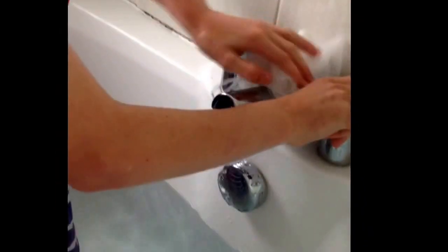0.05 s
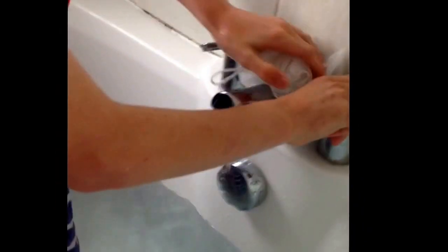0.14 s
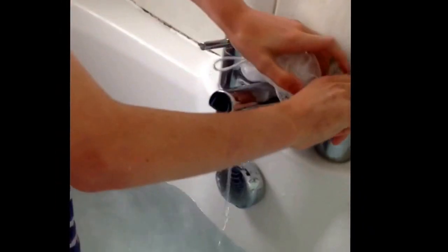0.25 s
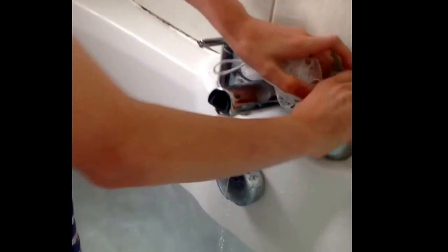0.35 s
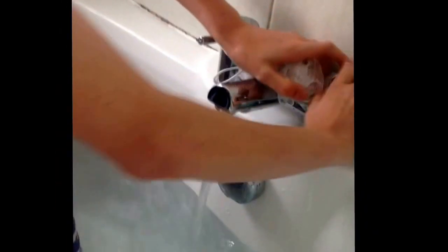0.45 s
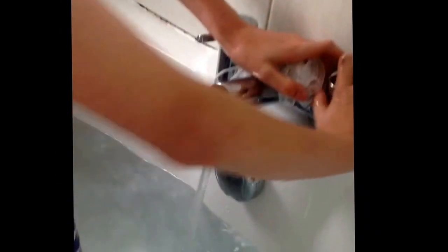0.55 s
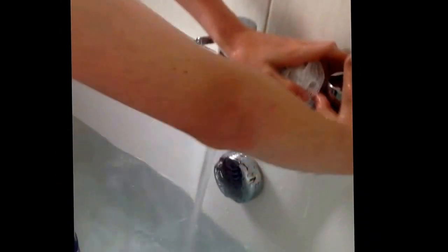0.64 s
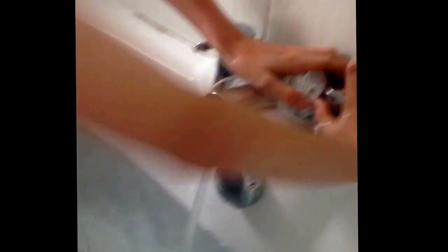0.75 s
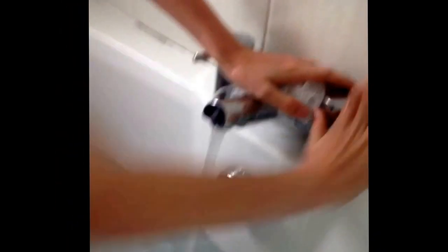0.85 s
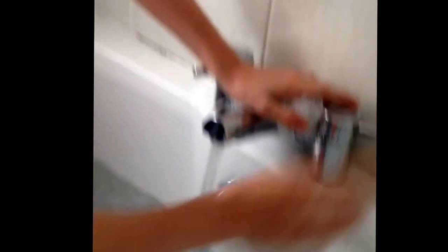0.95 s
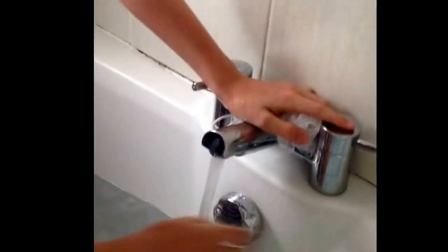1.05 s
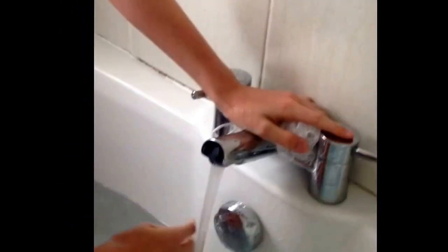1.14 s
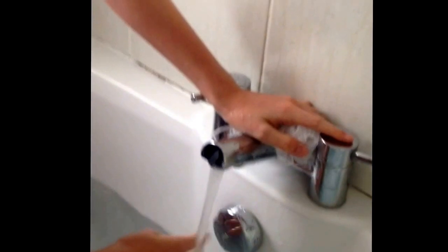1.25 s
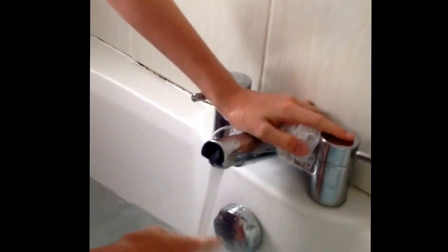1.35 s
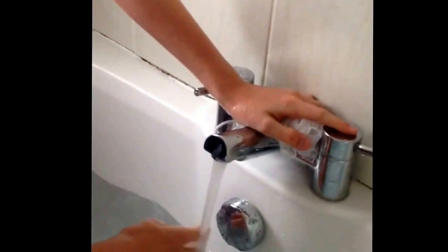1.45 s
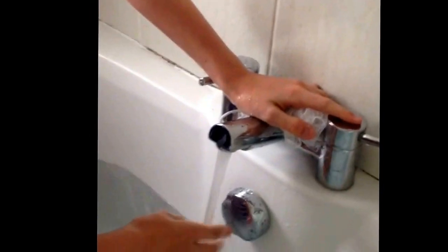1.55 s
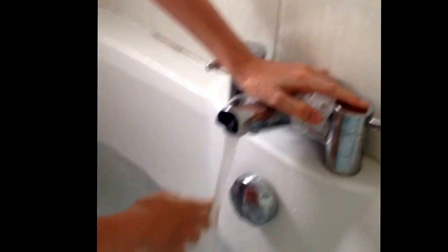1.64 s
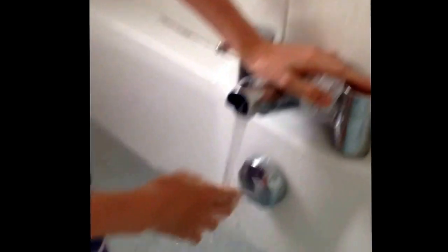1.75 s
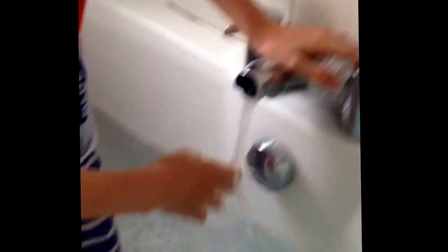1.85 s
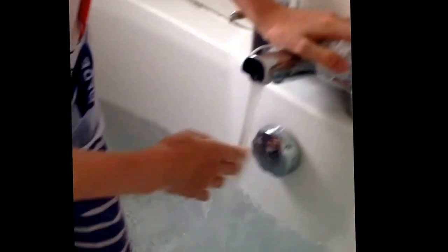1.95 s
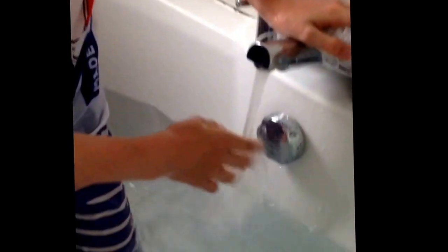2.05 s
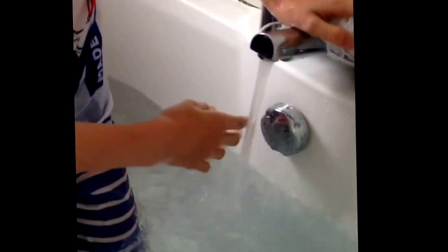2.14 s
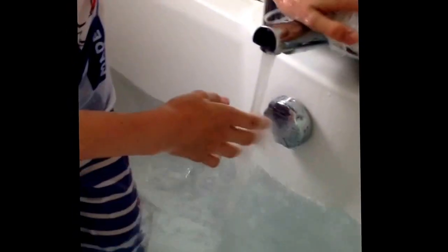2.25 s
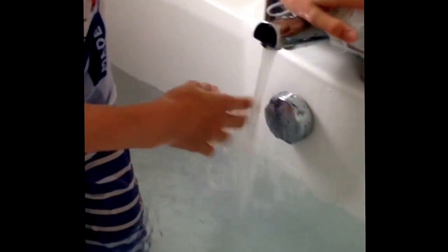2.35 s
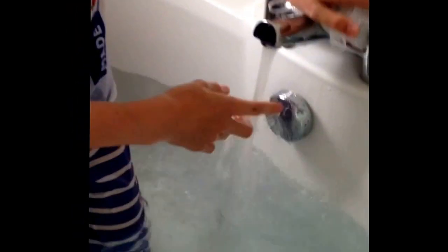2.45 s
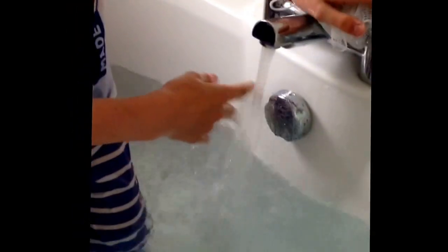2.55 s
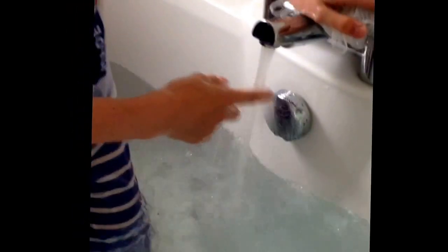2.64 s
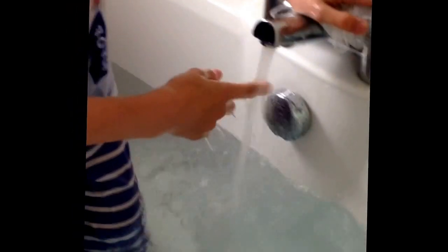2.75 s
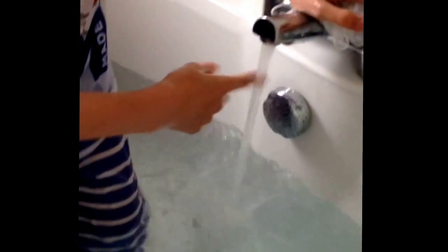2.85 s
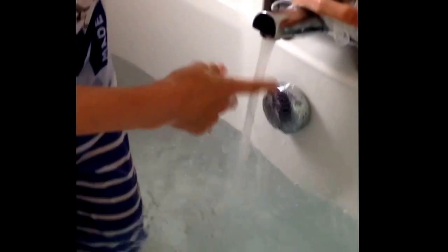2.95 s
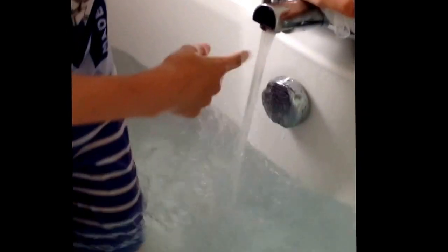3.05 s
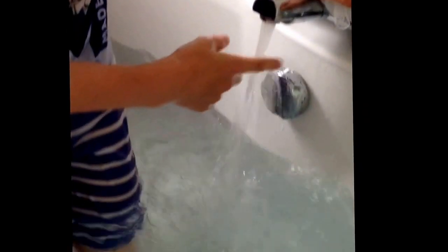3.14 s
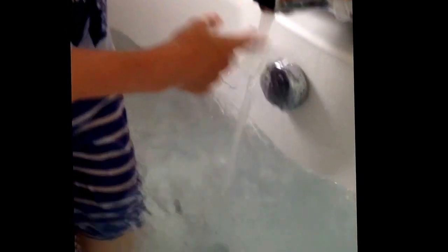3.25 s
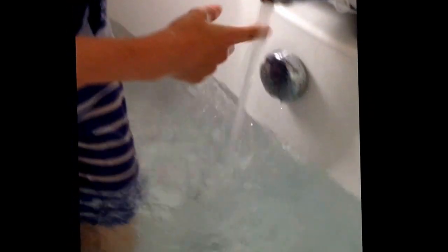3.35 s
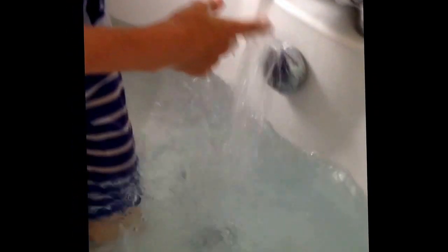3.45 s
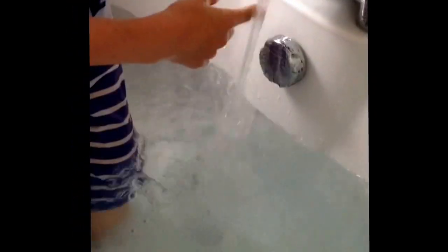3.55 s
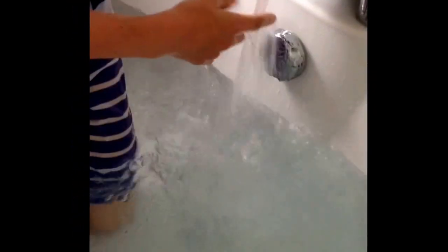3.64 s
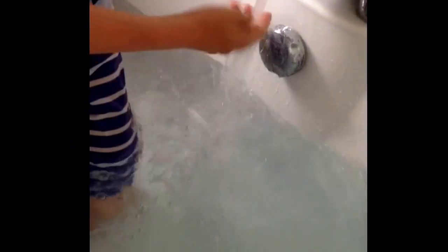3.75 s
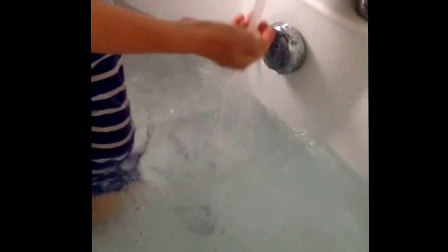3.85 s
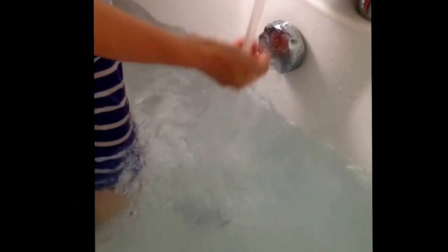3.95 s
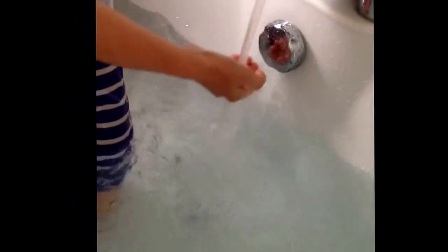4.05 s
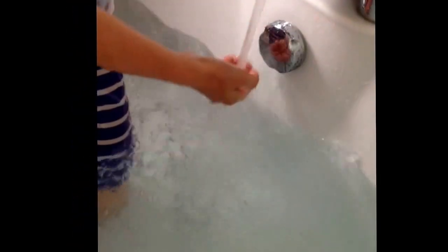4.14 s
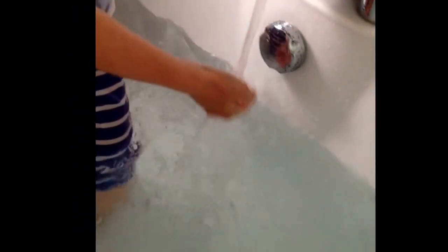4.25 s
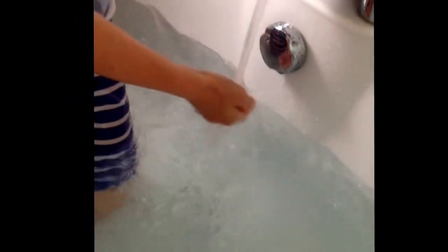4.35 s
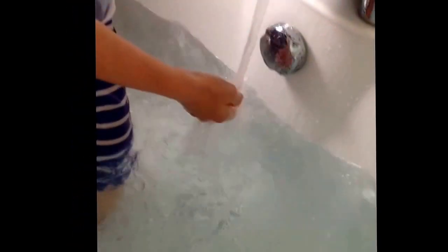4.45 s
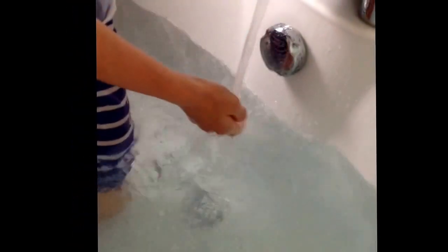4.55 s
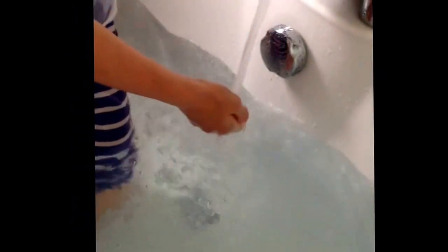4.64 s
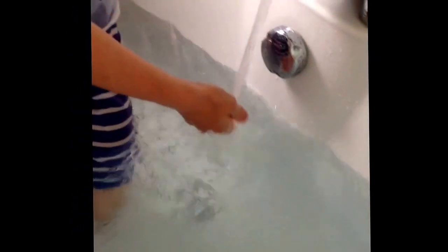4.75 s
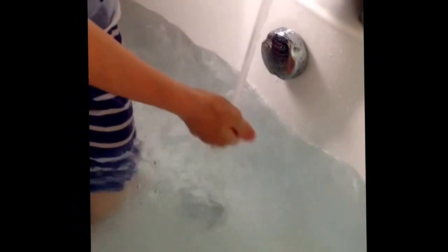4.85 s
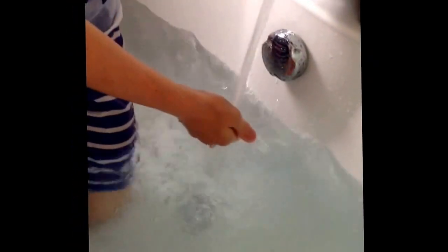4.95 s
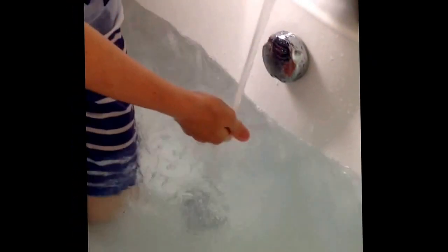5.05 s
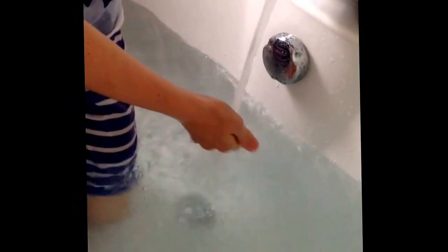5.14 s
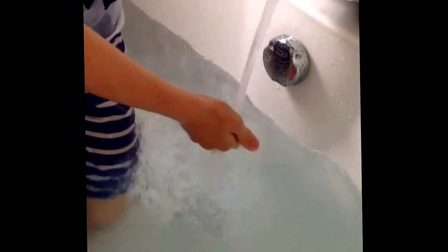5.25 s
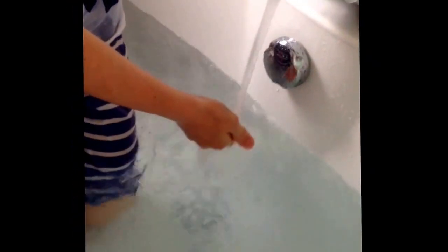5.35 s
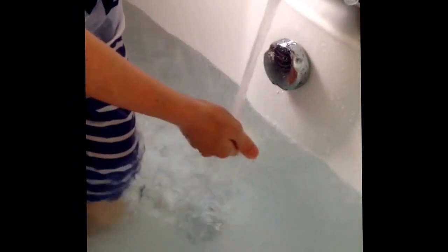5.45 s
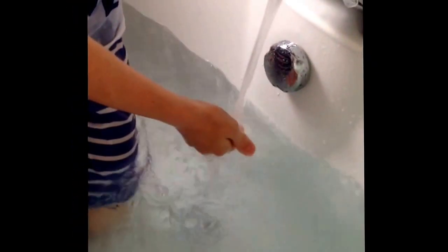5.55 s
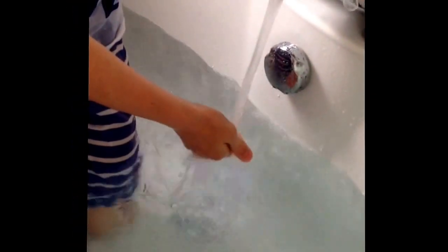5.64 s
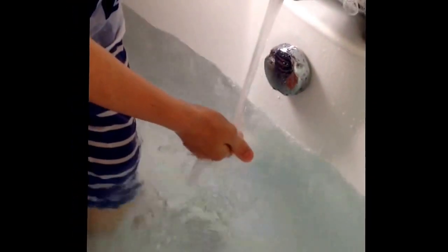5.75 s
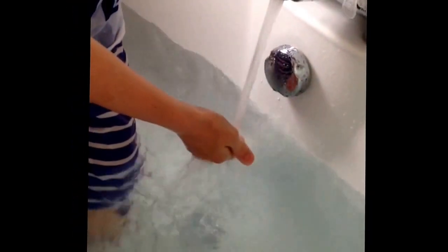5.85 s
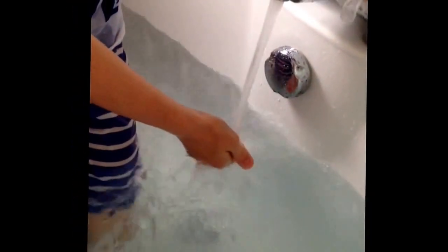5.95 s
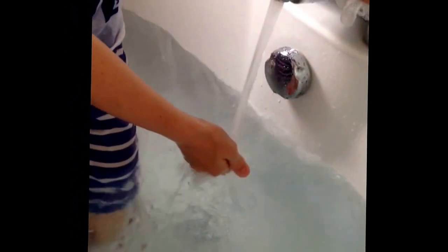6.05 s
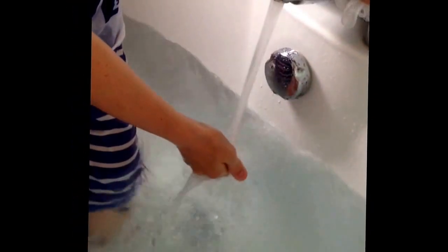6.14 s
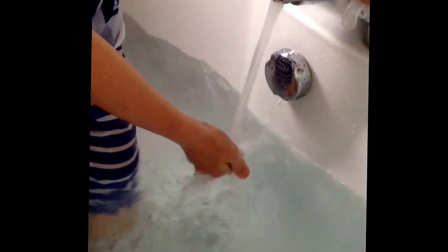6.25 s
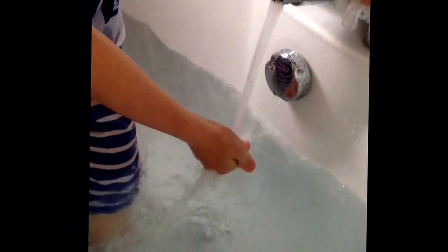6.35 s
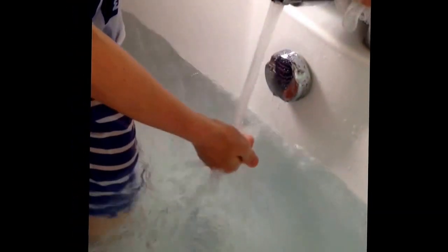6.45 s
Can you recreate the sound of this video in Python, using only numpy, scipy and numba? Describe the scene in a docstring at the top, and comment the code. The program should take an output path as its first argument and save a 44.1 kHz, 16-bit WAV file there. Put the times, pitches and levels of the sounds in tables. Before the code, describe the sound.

Close in a tiled bathroom, a near-silent moment with a faint pipe murmur and low plop. The tap valve hisses, hums and gives a tiny high whistle, then water surges into a full tub with bubbling and hollow drumming. A hand chops the stream into quick splashing slugs, then catches it, leaving a bright, steady patter with scattered plops.

```python
"""A bath tap is opened over a filled tub in a tiled bathroom, with one microphone near.
First the quiet room, a murmur in the pipe and one faint, low plop; then the valve hisses, hums and whistles.
The water surges: spray fizzes (noise and ticks), bubbles ring (damped sines), the jet drums (low modes).
A hand cuts in and out of the stream, so it lands in slugs, then catches it so that it only patters.
Most of the water's sound is also thrown back by the tiles, as echoes and a short tail."""
import sys
import numpy as np
from scipy import signal
from scipy.io import wavfile
from scipy.ndimage import uniform_filter1d
from numba import njit

SR = 44100
rng = np.random.default_rng(int(sys.argv[2]) if len(sys.argv) > 2 else 0)


def output_pcm(signal):
    """Save a mono or channel-first signal as 16-bit PCM at the path in sys.argv[1].

    Samples are clipped to [-1, 1] before scaling.
    """
    pcm = np.clip(np.atleast_2d(signal).T, -1, 1) * 32767
    wavfile.write(sys.argv[1], SR, np.round(pcm).astype(np.int16))


N = 287091  # length in samples


def gain_of(db):
    """Turn decibels into a plain multiplier."""
    return 10 ** (np.asarray(db) / 20)


def evened(x):
    """Scale a signal to an average (RMS) level of one."""
    return x / np.sqrt(np.mean(x ** 2) + 1e-20)


def smoothed_twice(x, size):
    """Two running averages along the samples leave only slow wandering."""
    return uniform_filter1d(uniform_filter1d(x, size=size), size=size)


def read(points, hz):
    """Look up a curve drawn over pitch, with straight lines on a log-pitch scale."""
    f, value = np.transpose(points)
    return np.interp(np.log(hz + 1), np.log(f + 1), value)


def hiss(spectrum, patchy_db, flicker_db):
    """Random short-time spectra with drifting patches and a flicker shared by all bands."""
    frames, hz = N // 128 + 5, np.fft.rfftfreq(512, 1 / SR)
    a, b, patches = rng.standard_normal((frames, 257, 3)).T
    patches = uniform_filter1d(patches, size=8, axis=0)  # across pitch
    patches = evened(uniform_filter1d(patches, size=10, axis=1))  # across time
    flicker = evened(uniform_filter1d(rng.standard_normal(frames), size=3))
    level_db = read(spectrum, hz)[:, None] + patchy_db * patches + flicker_db * flicker
    spectra = (a + 1j * b) * gain_of(level_db)
    return evened(signal.istft(spectra, nperseg=512, noverlap=384)[1][:N])


# The empty room's noise. Each row: pitch in Hz, relative level in dB per Hz.
QUIET = [(24, -52), (40, -4), (162, 3.5), (562, -19), (859, -4), (1310, -24), (1960, -19.5), (6640, -17.5),
         (9890, -9), (15500, -16)]
QUIET_DB = -57


def quiet_room():
    """The empty room is a faint steady noise with its own tone colour."""
    return gain_of(QUIET_DB) * hiss(QUIET, patchy_db=2.5, flicker_db=1.5)


def pipe(curve, size):
    """A fuzzy whistle in the tap; the smoother the noise (size in samples), the purer the note."""
    s, db, hz = np.transpose(curve)
    t = np.arange(N) / SR
    a, b = smoothed_twice(rng.standard_normal((2, N)), size)
    turns = 2 * np.pi * np.cumsum(np.interp(t, s, hz)) / SR
    note = evened(a * np.cos(turns) + b * np.sin(turns))
    return gain_of(np.interp(t, s, db, left=-120, right=-120)) * note


# The murmur as the valve opens. Each row: time in seconds, level in dB, pitch in Hz.
MURMUR = [(0, -72, 840), (.08, -65, 835), (.13, -75, 840), (.2, -61, 835), (.27, -61, 880), (.33, -70, 850)]


def murmur():
    """The opening valve murmurs on one soft, fuzzy note."""
    return pipe(MURMUR, size=900)


@njit
def ring(n, sr, start, size, hz, t60, glide, rise):
    """Damped sines whose pitch climbs, as when a bubble nears the surface."""
    out = np.zeros(n)
    for i in range(len(start)):
        for k in range(min(int(t60[i] * sr), n - start[i])):
            t = k / sr
            swell = (1 - np.exp(-hz[i] * t / rise)) ** 2  # a bubble takes a cycle or two to close
            fade = np.exp(-np.log(1000) * t / t60[i])  # 60 dB down after t60 seconds
            turns = hz[i] * t * (1 + glide[i] * t / t60[i])
            out[start[i] + k] += size[i] * swell * fade * np.sin(2 * np.pi * turns)
    return out


# Single loud bubbles and a few deep thumps of the tub.
# Each row: start in seconds, level in dB before the swell and fade, pitch in Hz.
PLOPS = [(0.09, -51, 167), (0.376, -25, 710), (0.447, -33, 1300), (0.479, -28, 2940), (0.51, -21, 2540),
         (0.526, -24, 520), (0.549, -28, 550), (0.569, -29, 690), (0.577, -25, 273), (0.583, -20, 732),
         (0.5839, -8, 2530), (0.5839, -5, 2110), (0.5837, -17.5, 7300), (0.5912, -10, 2370),
         (0.627, -14, 2280), (0.8005, -19, 2210), (0.8074, -10.5, 2610), (0.918, -20, 183),
         (0.948, -17, 2660), (1.042, -25, 177), (1.047, -19, 3130), (1.102, -12.5, 5130), (1.307, -22, 660),
         (1.313, -15, 167), (1.514, -23, 1140), (1.584, -30.5, 284), (1.586, -16, 2700), (1.616, -16, 1405),
         (1.815, -15, 2010), (1.957, -30, 1570), (1.987, -22, 980), (2.04, -19, 2160), (2.131, -22, 1700),
         (2.193, -29, 745), (2.241, -23.5, 673), (2.271, -32, 92), (2.721, -42, 89.5), (2.277, -34, 172),
         (2.276, -11.5, 2290), (2.4, -14.5, 2630), (2.429, -19, 1390), (2.474, -24, 647),
         (2.522, -16, 2130), (2.546, -17, 1900), (2.578, -18, 1950), (2.581, -21, 247), (2.658, -12, 2280),
         (2.8493, -14, 2290), (3.016, -18, 2220), (3.097, -11, 2180), (3.108, -12, 2250),
         (3.098, -23.5, 86), (3.2462, -25, 2200), (3.309, -17.5, 985), (3.321, -17, 1010),
         (3.311, -22.5, 238), (3.324, -11, 2220), (3.363, -22.5, 184), (3.4597, -12, 2210),
         (3.5191, -14.5, 2200), (3.593, -24.5, 254), (3.5962, -19, 2500), (3.7047, -28, 2180),
         (3.793, -19, 258), (3.796, -29, 666), (4.223, -24, 963), (4.318, -19, 2730), (4.3678, -14.5, 1810),
         (4.8273, -19, 2760), (4.8525, -15, 2390), (4.996, -25, 955), (5.471, -24, 1144),
         (5.5824, -22, 2280), (6.079, -26, 2530), (6.314, -16, 2250), (6.4465, -16, 2620)]
PLOP_T60_S, PLOP_SLOPE = 0.045, 0.96  # ring time at 1 kHz; higher plops die sooner, by this power of pitch
TWIN_DB, TWIN_LAG_CYCLES, TWIN_DETUNE = -5, 12, 0.07  # level; longest lag; most it is off pitch, as a share


def plops():
    """Single loud bubbles and a few deep thumps of the tub, each with a fainter twin of nearly its pitch."""
    s, db, hz = np.transpose(PLOPS)
    lag, off = rng.random((len(s), 2)).T
    twin_s = s + TWIN_LAG_CYCLES * lag / np.maximum(hz, 1000)  # low plops lag as if they were at 1 kHz
    twin_hz = hz * (1 + TWIN_DETUNE * (2 * off - 1))
    s, db, hz = np.r_[s, twin_s], np.r_[db, db + TWIN_DB], np.r_[hz, twin_hz]
    t60 = np.clip(PLOP_T60_S * (1000 / hz) ** PLOP_SLOPE, .004, .25)
    start = (s * SR).astype(np.int64)
    return ring(N, SR, start, gain_of(db), hz, t60, np.full(len(s), .04), 1.8)


# The steady stream. Each row: time in seconds, then levels in dB before the room adds its echoes,
# for spray, small bubbles, the jet's drumming, and large air pockets.
STREAM = [(0.21, -69, -72, -61, -65), (0.345, -64, -60, -56, -62), (0.38, -44, -44.5, -50, -72),
          (0.43, -46, -60, -48, -56), (0.51, -45, -39, -47, -57), (0.571, -50, -53, -39, -32.5),
          (0.6, -37, -37, -36.5, -38), (0.76, -37, -37, -37, -51), (1.0, -34, -36.5, -39.5, -50),
          (1.205, -34, -37, -39.5, -49), (1.25, -32, -38, -44, -56), (1.6, -30.5, -37.5, -43.5, -51),
          (1.8, -31, -36.5, -54, -65), (2.05, -30, -34.5, -46, -50.5), (2.17, -34.5, -37.5, -51, -61.5),
          (2.6, -37, -45, -46, -59), (3.06, -37, -39, -40.5, -44), (3.68, -35, -39, -40.5, -46.5),
          (3.8, -35.5, -38, -47, -37), (4.0, -34, -43.5, -53, -59.5), (4.2, -32.5, -42, -46.5, -60),
          (4.5, -33.5, -39, -52.5, -66), (5.12, -32.5, -41.5, -51.5, -53), (5.36, -32.5, -43.5, -52, -57),
          (5.59, -31, -42, -49, -68), (5.91, -35, -41.5, -49, -63), (6.27, -33.5, -41.5, -50.5, -61),
          (6.51, -30.5, -38, -50, -61)]
# Slugs let through by the hand. Each row: start in seconds, length in seconds before the fall begins,
# then levels in dB for the same four layers as the stream.
SLUGS = [(0.888, 0.039, -35, -38, -34.5, -39), (1.285, 0.087, -47, -41.5, -32.5, -43),
         (1.601, 0.048, -30, -46, -43, -47), (1.813, 0.041, -47, -36, -52, -54),
         (2.102, 0.03, -32, -45, -61, -67), (2.183, 0.035, -33.5, -31.5, -59, -60),
         (2.267, 0.02, -33.5, -34.5, -34, -63), (2.339, 0.029, -32, -38, -52, -49),
         (2.41, 0.032, -31.5, -31, -57, -41.5), (2.46, 0.02, -49, -37, -38, -39.5),
         (2.509, 0.063, -35.5, -33.5, -35, -49), (2.57, 0.065, -38, -39, -46, -42.5),
         (2.642, 0.02, -28, -39, -36, -58), (2.718, 0.021, -41, -33, -41, -38.5),
         (2.766, 0.027, -32, -34, -34, -40.5), (2.836, 0.059, -29.5, -32.5, -42, -58),
         (2.94, 0.037, -40, -49, -34, -61), (2.989, 0.033, -31.5, -34.5, -37.5, -58),
         (3.086, 0.036, -28, -28, -28.5, -51), (3.234, 0.037, -35, -41, -30, -48),
         (3.306, 0.071, -38.5, -32, -32, -42), (3.355, 0.035, -35, -45, -47, -48),
         (3.488, 0.031, -30.5, -41, -48, -56), (3.586, 0.047, -29, -31.5, -30, -64),
         (3.679, 0.11, -50, -31.5, -32, -41), (3.723, 0.031, -34, -40, -45, -52),
         (3.805, 0.1, -33, -36.5, -50, -53), (4.06, 0.14, -34.5, -44.5, -51, -55),
         (4.202, 0.051, -39, -36.5, -54, -47.5), (4.332, 0.087, -30.5, -55, -56, -61),
         (5.699, 0.12, -38, -42, -50, -54)]
SLUG_RISE_S, SLUG_FALL_DB_PER_S = 0.011, 428


def flow(order):
    """One layer's gain: the stream, silent before the water arrives, with the slugs adding their power."""
    t, rows = np.arange(N) / SR, np.transpose(STREAM)
    power = gain_of(np.interp(t, rows[0], rows[order], left=-120)) ** 2
    age = np.arange(SR // 3) / SR
    for start, length, *db in SLUGS:
        rise = np.minimum(age / SLUG_RISE_S, 1)
        fall = gain_of(-SLUG_FALL_DB_PER_S * np.maximum(age - length, 0))
        power[round(start * SR):][:len(age)] += (gain_of(db[order - 1]) * rise * fall) ** 2
    return np.sqrt(power)


def swarm(spectrum, per_s, cycles, spread_db, glide):
    """Bubbles of random size at random moments; a few are much louder than the rest."""
    moment, pitch, loud, length, climb = rng.random((int(per_s * N / SR), 5)).T
    lowest, highest = spectrum[0][0], spectrum[-1][0]
    hz = lowest * (highest / lowest) ** pitch
    size = gain_of(read(spectrum, hz) + spread_db * np.minimum(-np.log(1 - loud), 3.3))
    t60 = cycles * (.5 + length) / hz
    return evened(ring(N, SR, (moment * N).astype(np.int64), size, hz, t60, glide * climb, 0.48))


# The colour of the spray. Each row: pitch in Hz, relative level in dB (per Hz for the hiss).
SPRAY = [(1470, -24.5), (2500, -4), (3240, -4), (4710, -2), (5120, -1.5), (6800, -3), (14500, -8),
         (15500, -8)]


def spray():
    """Fine hiss and tiny droplets ticking as very short rings."""
    ticks = swarm(SPRAY, per_s=3000, cycles=2.77, spread_db=5.5, glide=0.051)
    fizz = hiss(SPRAY, patchy_db=1.8, flicker_db=1.32) + gain_of(-6.5) * ticks
    return flow(order=1) * evened(fizz)


# Small bubbles. Each row: pitch in Hz, relative level in dB.
BUBBLES = [(800, -15.5), (1010, -12.5), (1300, -6), (1700, -3.5), (2230, -1), (2800, 1), (3800, 0),
           (6000, -6), (9000, -40)]
# Large air pockets. Each row: pitch in Hz, relative level in dB.
POCKETS = [(300, -9), (450, -9.5), (550, -8.5), (670, 0), (780, -20), (950, -6)]
HOLLOW_HZ, HOLLOW_WIDTH_HZ, HOLLOW_DB = 2208, 67, -1  # a narrow ring that the small bubbles keep exciting


def churn():
    """Small bubbles that come in clumps, and the lower, longer rings of large air pockets."""
    small = swarm(BUBBLES, per_s=1600, cycles=20.3, spread_db=3.0, glide=0.2)
    large = swarm(POCKETS, per_s=700, cycles=30.5, spread_db=4.0, glide=0.41)
    b, a = signal.iirpeak(HOLLOW_HZ, HOLLOW_HZ / HOLLOW_WIDTH_HZ, SR)
    small = small + gain_of(HOLLOW_DB) * signal.lfilter(b, a, small)
    clumps = gain_of(2.1 * evened(smoothed_twice(rng.standard_normal(N), 1500)))
    return flow(order=2) * evened(clumps * small) + flow(order=4) * large


# Low notes of the tub and the room, set ringing by the jet.
# Each row: pitch in Hz, width in Hz (wider dies sooner), relative level in dB.
LOW_NOTES = [(91.6, 4.8, -3.5), (120.3, 7.1, 1), (158, 9.4, -4), (181.5, 15.3, 11.5), (224, 15, 2),
             (254.4, 10.7, 6.5), (278, 33, 1), (361, 25, -7), (436.3, 13.2, -0.5), (536, 4.3, -7),
             (679, 56, -1.5), (1005, 8.3, 0)]


def drumming():
    """Lumpy blows of the jet set low notes of the tub and the room ringing."""
    lumps = gain_of(2.5 * evened(uniform_filter1d(rng.standard_normal(N), size=900)))
    drive = flow(order=3) * evened(lumps * rng.standard_normal(N))
    t = np.arange(SR // 3) / SR
    modes = np.zeros(len(t))
    for hz, width, db in LOW_NOTES:
        modes += gain_of(db) * np.exp(-np.pi * width * t) * np.sin(2 * np.pi * hz * t)
    return signal.oaconvolve(drive, modes / np.linalg.norm(modes))[:N]


# Water slapping the surface. Each row: start in seconds, level in dB before the rise and fade.
SLAPS = [(0.36, -29), (0.375, -23.5), (0.443, -29), (0.5095, -28), (0.583, -15.5), (0.8084, -15.5),
         (1.047, -15.5), (1.1021, -21), (1.1805, -19), (1.2206, -17.5), (1.3072, -15), (1.481, -15),
         (1.6, -18), (1.7278, -19), (1.843, -18), (2.099, -13.5), (2.426, -19), (2.5228, -14), (2.592, -16),
         (2.7665, -12), (2.849, -21), (2.9504, -17.5), (3.015, -18), (3.0916, -32), (3.112, -11),
         (3.247, -13.5), (3.322, -15.5), (3.502, -26), (3.62, -15), (3.7311, -17), (3.818, -21),
         (3.873, -17), (4.218, -16), (4.314, -12.5), (4.375, -14), (4.666, -17), (4.851, -19), (5.536, -22),
         (5.5705, -16.5), (5.6433, -23), (5.737, -18), (5.973, -23), (6.0962, -17)]
SLAP_RISE_S, SLAP_T60_S = 0.002, 0.024


def slaps():
    """Bright bursts of spray that rise in a moment and die quickly."""
    t, shape = np.arange(4000) / SR, np.zeros(N + 4000)
    for s, db in SLAPS:
        rise = 1 - np.exp(-t / SLAP_RISE_S)
        shape[round(s * SR):][:4000] += rise * gain_of(db - 60 * t / SLAP_T60_S)
    return shape[:N] * hiss(SPRAY, patchy_db=1.5, flicker_db=1.2)


# First water hissing through the valve. Each row: time in seconds, level in dB, pitch in Hz.
SPURT = [(.36, -60, 3210), (.37, -40, 3300), (.40, -42, 3750), (.46, -43.5, 3700), (.52, -50, 3520)]


def spurt():
    """The first water hisses through the valve: a very fuzzy, high note."""
    return pipe(SPURT, size=60)


# Droplets bursting in a cluster. Each row: start in seconds, level in dB before the swell and fade,
# centre pitch in Hz.
SPLATS = [(0.3608, -23.5, 2850), (0.4008, -19, 5500), (1.728, -16, 4470), (2.7667, -14.5, 3980),
          (3.873, -15, 3050), (4.1496, -14.5, 2930), (4.3138, -19, 3620), (4.4015, -19, 3100),
          (5.15, -22, 2600), (5.288, -26, 2300), (5.4, -39, 3800), (5.464, -21, 5000), (5.5702, -17, 2640),
          (5.644, -16, 6300), (6.0967, -17, 4600), (6.117, -18, 3640)]
SPLAT_S, SPLAT_CYCLES, SPLAT_SCATTER = 0.005, 16, 0.12  # longest spread; cycles to fade 60 dB; pitch share


def splats(count=6):
    """Each burst is a handful of short droplets of neighbouring sizes; the first is the loudest."""
    s, db, hz = np.transpose(SPLATS)[:, :, None]
    when, off = rng.random((len(SPLATS), count, 2)).transpose(2, 0, 1)
    when = when * np.arange(count) / count
    place = np.arange(count) * 0.604 % 1 + off / count  # spreads the droplets over the pitch range
    hz = (hz * (1 + SPLAT_SCATTER * (2 * place - 1))).ravel()
    start = ((s + SPLAT_S * when) * SR).astype(np.int64).ravel()
    size = gain_of(db - 4.9 * when).ravel()
    return ring(N, SR, start, size, hz, SPLAT_CYCLES / hz, np.full(len(hz), .1), 0.54)


# The low hum of the valve. Each row: time in seconds, level in dB before the flutter, pitch in Hz.
GROAN = [(.372, -62, 692), (.38, -40, 706), (.44, -47, 709), (.455, -42, 660), (.50, -43, 660),
         (.525, -60, 595)]
THROB_HZ, THROB_DEPTH = 56, 0.6


def groan():
    """The valve hums on a low note whose loudness flutters."""
    throb = 1 + THROB_DEPTH * np.sin(2 * np.pi * THROB_HZ * np.arange(N) / SR)
    return throb * pipe(GROAN, size=900)


# Chains of bubbles from one gurgling spot. Each row: start in seconds, length in seconds,
# highest level in dB before the swell and fade, first pitch in Hz, last pitch in Hz (before the scatter).
GURGLES = [(.403, 0.039, -32, 5460, 5600), (.905, 0.055, -36, 447, 680), (0.741, 0.14, -17.5, 2070, 2100),
           (0.967, 0.058, -32, 2650, 2620), (0.988, 0.028, -18, 5000, 5060),
           (1.116, 0.018, -28, 2040, 2100), (1.368, .015, -24, 5050, 5100),
           (1.248, 0.039, -25.5, 2000, 2060), (1.458, 0.031, -28, 1440, 1820),
           (1.547, .075, -22, 1430, 1540), (1.619, 0.021, -27, 1650, 1720), (1.7, 0.077, -21, 2120, 2080),
           (1.798, 0.031, -31, 1280, 1306), (1.853, 0.091, -29.5, 890, 816),
           (1.932, .04, -26.5, 1490, 1590), (1.991, 0.022, -32, 950, 1040), (2.02, 0.036, -22, 2050, 2200),
           (2.05, .035, -27, 1640, 1690), (2.435, 0.046, -25, 1600, 2380),
           (2.524, 0.079, -19.5, 2710, 1980), (2.664, 0.038, -22, 2220, 2580),
           (2.728, 0.057, -20, 2380, 2440), (3.692, 0.027, -19, 2200, 2200), (3.74, .03, -22, 2200, 2480),
           (4.372, .04, -28, 1910, 1950), (4.397, 0.039, -21.5, 3050, 3150),
           (4.831, 0.045, -28, 2260, 2300), (4.946, 0.028, -25, 2380, 2320),
           (5.396, 0.023, -21, 4500, 2780), (5.28, 0.027, -29, 2200, 3080), (5.564, 0.024, -19, 2290, 3400),
           (6.128, 0.056, -26, 3200, 2400), (6.287, 0.074, -27.5, 2260, 2300)]
GURGLE_CYCLES, GURGLE_SCATTER, GURGLE_SPREAD_DB = 29.6, 0.037, 7.5  # cycles to fade 60 dB; pitch share; dB


def gurgles(count=10):
    """Each chain sheds ringing bubbles at random moments along its glide."""
    s, length, db, first, last = np.transpose(GURGLES)[:, :, None]
    when, size, off = rng.random((len(GURGLES), count, 3)).transpose(2, 0, 1)
    when = (np.arange(count) + when) / count
    glide_hz = first + (last - first) * when
    hz = (glide_hz * (1 + GURGLE_SCATTER * (2 * off - 1))).ravel()
    start = ((s + length * when) * SR).astype(np.int64).ravel()
    size = gain_of(db - GURGLE_SPREAD_DB * size).ravel()
    return ring(N, SR, start, size, hz, GURGLE_CYCLES / hz, np.full(len(hz), .08), 0.57)


# The valve's whistle before the surge. Each row: time in seconds, level in dB, pitch in Hz.
SQUEAL = [(.505, -60, 2550), (.515, -38, 2540), (.55, -38, 2500), (.575, -59, 2520)]


def squeal():
    """The valve whistles on one high, nearly pure note."""
    return pipe(SQUEAL, size=700)


# How fast the tiles' echo tail dies. Each row: pitch in Hz, time to fall by 60 dB in seconds.
TILES = [(100, 0.44), (500, 0.37), (2000, 0.27), (6000, 0.084), (14000, 0.2)]
# Near echoes from tub walls and tiles. Each row: typical delay in seconds, level in dB.
ECHOES = [(.0025, -13), (.0063, -9), (0.0097, -10), (.024, -14.5)]


def reflections(tail_db):
    """Near echoes, then sparse taps of random sign, each band dying at its own speed."""
    taps = np.zeros(SR // 4)
    at = np.arange(300, SR // 4 - 20, 20)
    taps[at + rng.integers(0, 20, len(at))] = rng.choice([-1., 1.], len(at))
    hz, t, z = signal.stft(taps, SR, nperseg=256)
    fade = gain_of(-60 * t / read(TILES, hz)[:, None])
    tail = signal.istft(z * fade, SR, nperseg=256)[1]
    response = gain_of(tail_db) * tail / np.linalg.norm(tail)
    for s, db in ECHOES:
        response[round(s * SR * rng.uniform(.93, 1.07))] += gain_of(db)
    return response


def bathroom(x, tail_db, count=19):
    """Each moment of sound comes from another spot of the restless water, with its own paths to the walls."""
    spot = np.arange(N) / SR * 40  # 40 spots a second, going round and round
    out = x.copy()
    for k in range(count):
        away = abs((spot - k + count / 2) % count - count / 2)
        share = np.clip(1 - away, 0, 1)  # neighbouring spots crossfade
        out += signal.oaconvolve(x * share, reflections(tail_db))[:N]
    return out


SPRAY_WET, SINGLES_WET = 0.59, 0.66  # shares of the spray and of the single sounds sent through the room


def scene():
    """Mix the water, partly through the room, with the drumming, the tap and the quiet room."""
    bright = spray() + slaps()
    singles = plops() + gurgles() + splats()
    water = SPRAY_WET * bright + churn() + SINGLES_WET * singles
    near = (1 - SPRAY_WET) * bright + (1 - SINGLES_WET) * singles
    tap = murmur() + groan() + squeal() + spurt()
    mono = bathroom(water, tail_db=-2.5) + near + drumming() + tap + quiet_room()
    return np.array([mono, mono])


BASS_CUT_HZ, EDGE_HZ = 75.6, 15480


def record(dry):
    """A small microphone that drops the deep bass; then a limit on the highest treble."""
    bass_cut = signal.butter(N=4, Wn=BASS_CUT_HZ, btype="highpass", fs=SR, output="sos")
    thin = signal.sosfilt(bass_cut, dry)
    treble_cut = signal.firwin(511, EDGE_HZ, window=("kaiser", 9), fs=SR)
    return signal.oaconvolve(thin, treble_cut[None], "same")


dry = scene()
out = record(dry)
output_pcm(out)
```